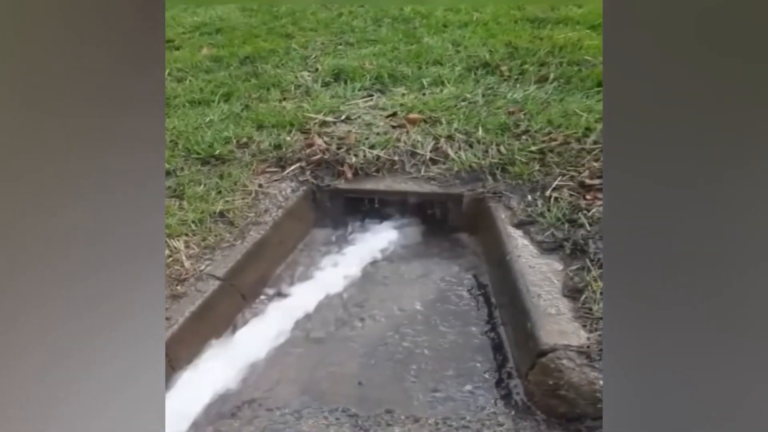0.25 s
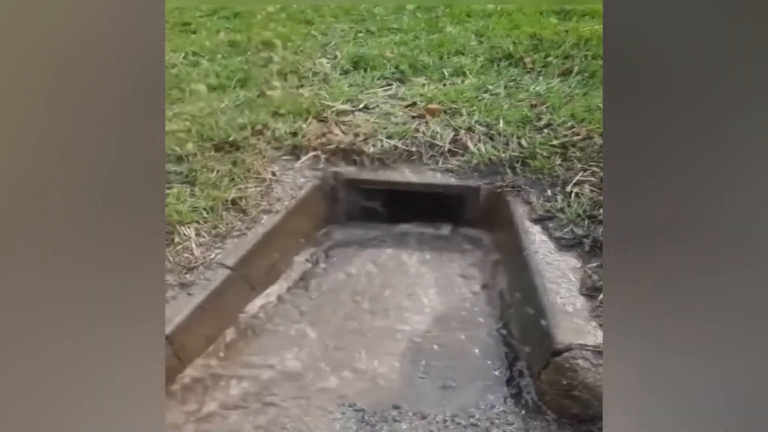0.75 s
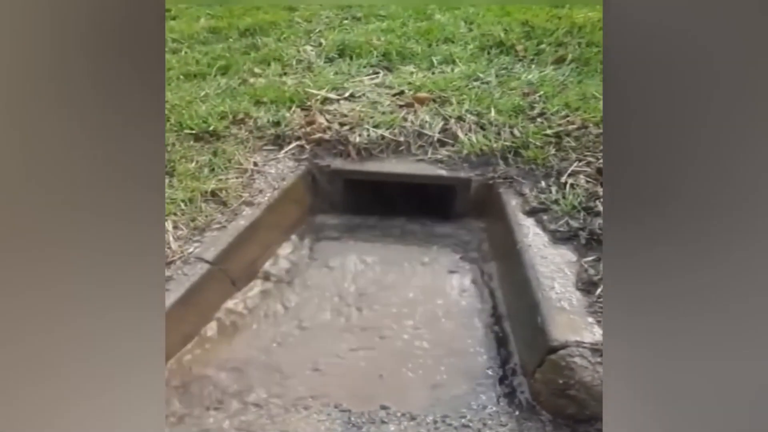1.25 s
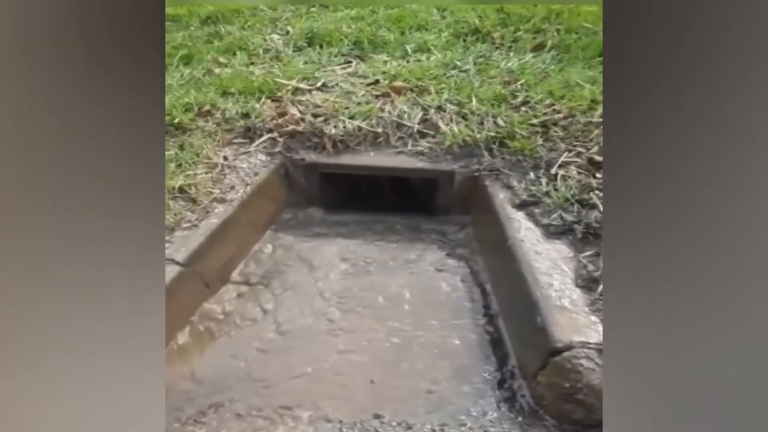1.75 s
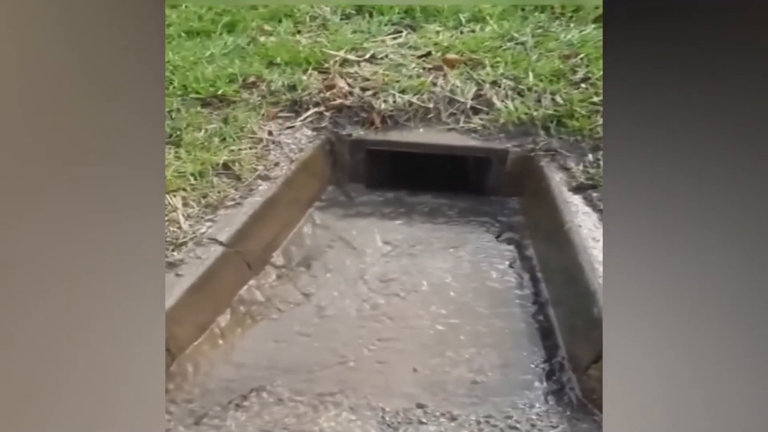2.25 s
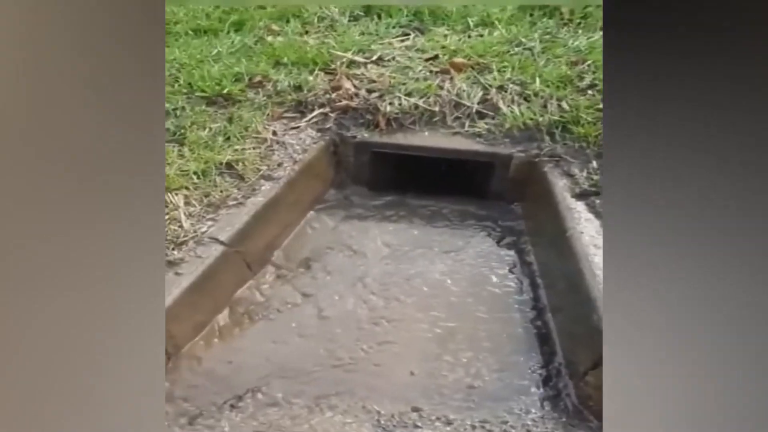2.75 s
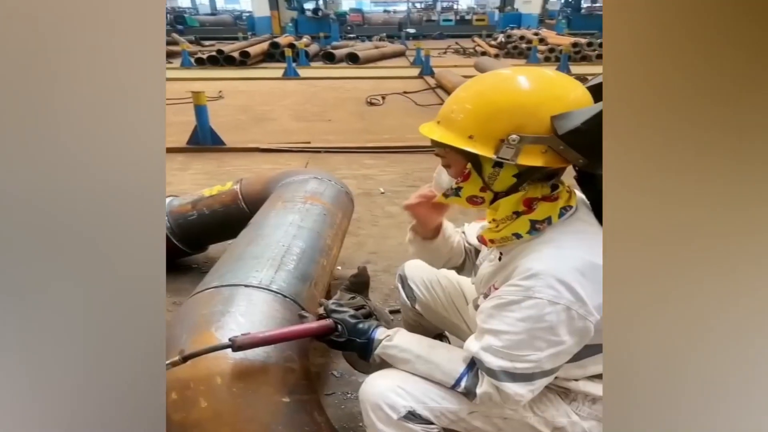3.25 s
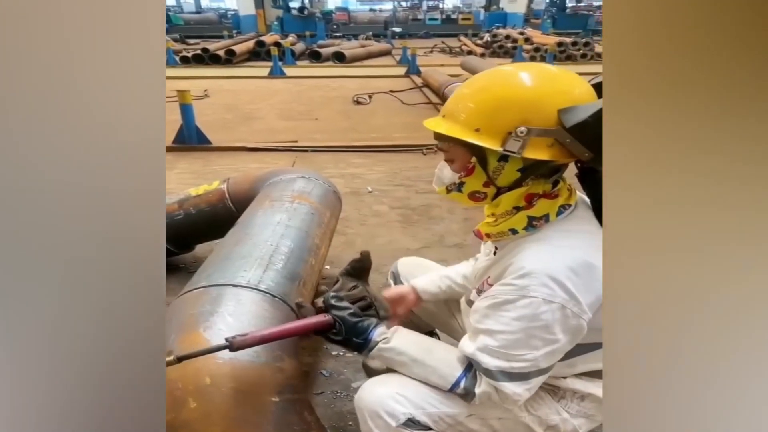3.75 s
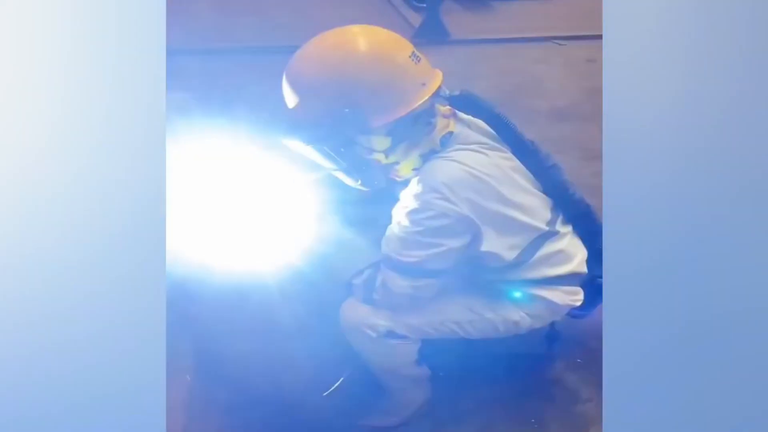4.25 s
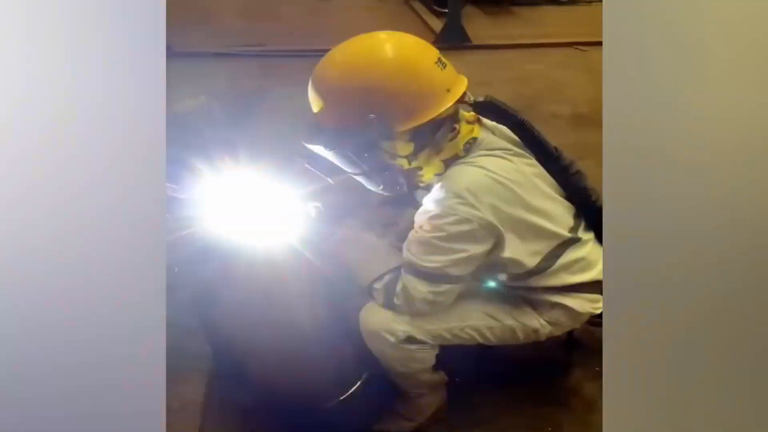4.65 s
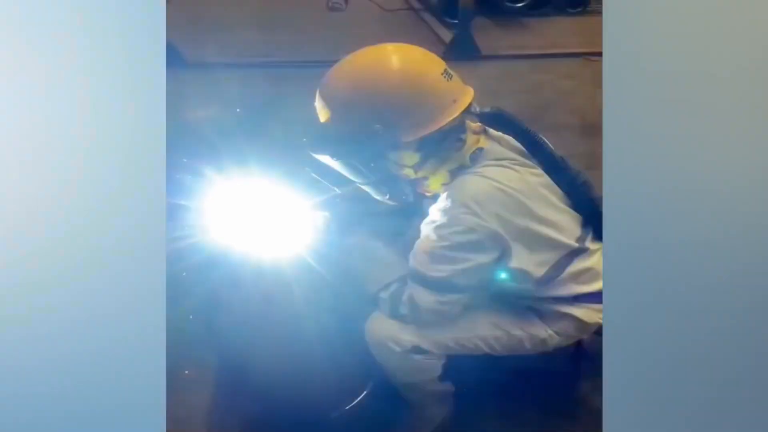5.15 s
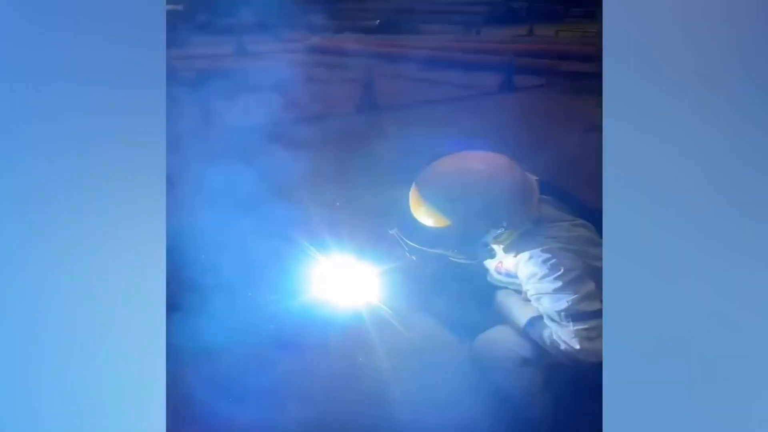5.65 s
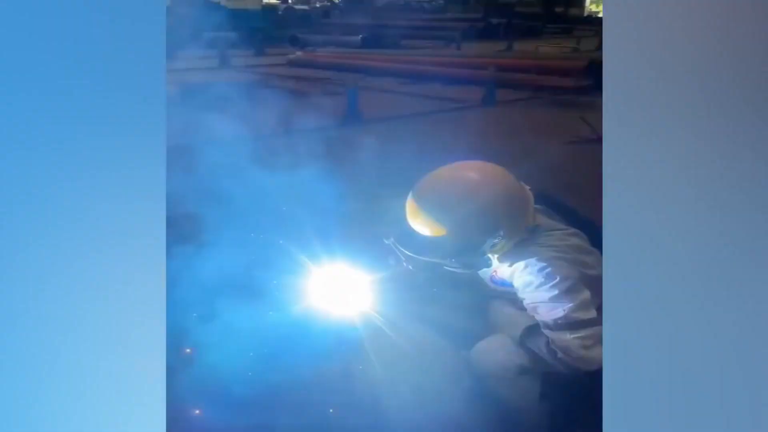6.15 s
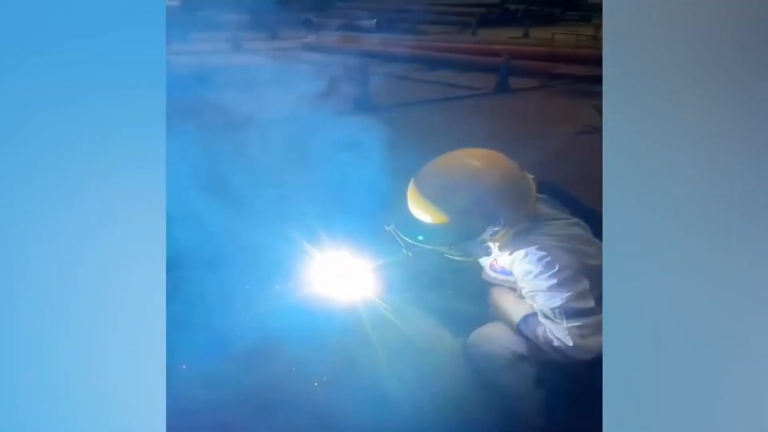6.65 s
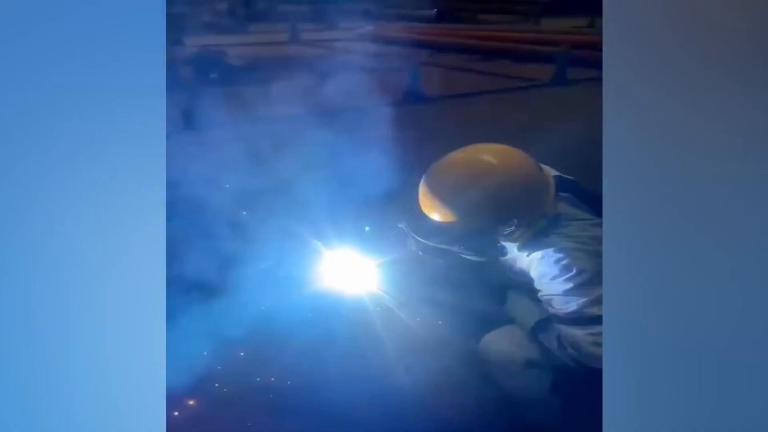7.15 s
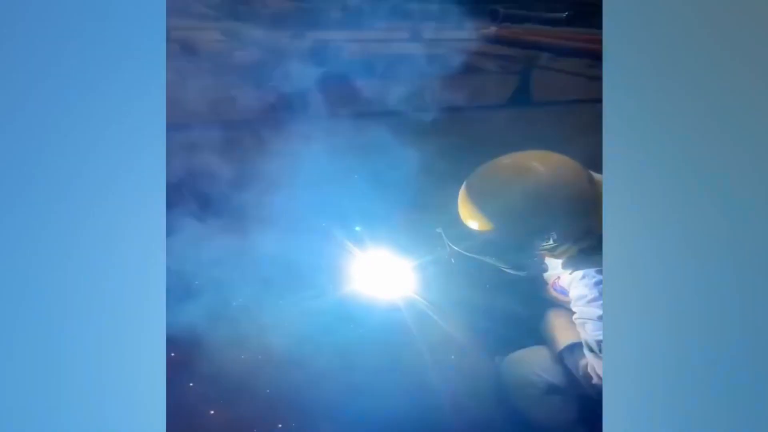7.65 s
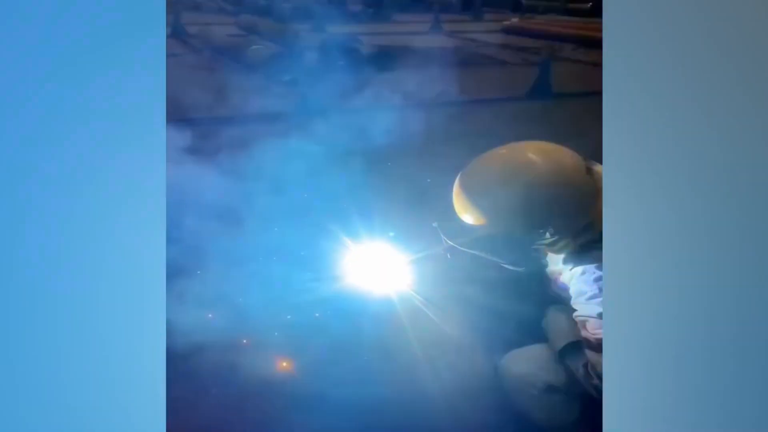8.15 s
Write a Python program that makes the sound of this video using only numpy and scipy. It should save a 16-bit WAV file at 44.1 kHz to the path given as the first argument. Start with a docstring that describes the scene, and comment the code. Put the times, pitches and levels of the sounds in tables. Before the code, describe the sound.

A water jet hisses in a drain over a droning pump engine, then a welding arc sputters, pops and hisses in a humming workshop.

```python
"""At a drain, then in a steel workshop. A sewer jetter blasts water through the drain pipe: on the right
the jet hisses, bursts through a plug of mud and goes on spraying, over the drone of its three-cylinder
pump engine. It all ends with a low bump. Then, in mono, fans and transformers hum in the workshop while
a stick welder strikes an arc. The arc sputters and pops as drops of molten metal burst, and later burns
with an even hiss."""
import sys
import numpy as np
from scipy import signal
from scipy.fft import rfft, irfft, next_fast_len
from scipy.io import wavfile
from scipy.ndimage import uniform_filter1d, map_coordinates

SR = 44100
rng = np.random.default_rng(int(sys.argv[2]) if len(sys.argv) > 2 else 0)


def pcm_store(signal):
    """Save signal as 16-bit PCM."""
    levels = np.round(np.clip(np.atleast_2d(signal), -1, 1) * 32767)
    wavfile.write(sys.argv[1], SR, levels.astype(np.int16).T)


N = 370440

MUD_START, BURST, MUD_END, JET_END = .35, .48, .569, 2.872  # at the drain, t/s
SHOP_START, STRIKE, SPUTTER_END, BURN_START = 2.985, 3.936, 5.446, 5.469  # in the workshop, t/s


# The water's tone (how strong each pitch is): f/Hz, level/dB
JET_TONE = [(300, -35), (500, -6), (1200, -8.5), (1900, -4.5), (2450, -1), (3000, -6.5), (3550, -12),
            (4200, -6.5), (5200, -7.5), (5800, -3), (6400, -1), (7300, -7), (9000, -14), (12400, -41)]  # at the mouth of the pipe
MUD_TONE = [(300, -37), (600, -7), (1100, -10.5), (1700, -3.5), (2300, 1), (2900, -6.5), (3700, -9.5),
            (4800, -2.5), (6200, 0), (7700, -3), (9000, -11.5), (12400, -42)]  # bursting through the mud
DEEP_PIPE_TONE = [(300, -10.5), (550, -10.5), (850, -11.5), (1120, -7), (1500, -9.5), (2200, -4.5),
                  (2700, -8), (3100, -3.5), (3700, -5), (5200, -5), (6350, 1.5), (6700, -1.5), (7700, -4),
                  (8100, -9), (9500, -13), (12400, -42)]  # further up the pipe
SPRAY_TONE = [(6000, -30), (8500, -21.5), (10000, -5.5), (11200, -2), (11900, 3), (12200, -6.5),
              (12800, -1), (14300, -4), (14700, -11.5), (15800, -11.5)]  # fine mist
# Gushes of spray: t/s, boost/dB
GUSHES = [(.64, 1), (.83, 2.5), (1.32, 3), (2.17, 1.5), (2.34, 2)]

def water_jet():
    """The jet bores through a plug of mud, then scours the pipe and throws fine spray in gushes."""
    opened = ramp(MUD_START, BURST)
    burst = opened - ramp(BURST, MUD_END)
    inside = ramp(1.12, 1.23)  # the nozzle is all the way in
    gush_db = sum(db * swell(s, rise=.064, fall=.095) for s, db in GUSHES)
    rush_db = -27.5 + 1.1 * opened + 7.5 * burst + .32 * gush_db
    spray_db = -34 + 7.5 * opened + 2 * inside + gush_db
    mud = np.clip(1.5 * burst, 0, 1)
    depth = ramp(.58, 1.27)  # the nozzle travels up the pipe
    pipe = np.sqrt(1 - depth) * splash(JET_TONE, rate=1500, click_db=-12, patchy_db=2.5)
    pipe += np.sqrt(depth) * splash(DEEP_PIPE_TONE, rate=1200, click_db=-8.5, patchy_db=2)
    rush = np.sqrt(1 - mud) * pipe + np.sqrt(mud) * splash(MUD_TONE, rate=900, click_db=-2.5, patchy_db=3)
    surge_db = .27 * wobble(22.17)
    spray = splash(SPRAY_TONE, rate=640, click_db=-8.5, patchy_db=2)
    rush *= amp(rush_db + surge_db + .43 * wobble(60))
    spray *= amp(spray_db + surge_db + .65 * wobble(45.1))
    return rush + spray


# Where the water sits: f/Hz, left minus right level/dB
WATER_BALANCE = [(400, -6), (1300, -9.5), (2400, -9.5), (4400, -8.5), (6500, -17.5), (8100, -13),
                 (12000, -17), (15000, -18.5)]
# How alike its two sides sound: f/Hz, likeness (1 = the same)
WATER_LIKENESS = [(300, 0.79), (640, 0.8), (1400, .05), (3100, 0.3), (7000, .12), (15000, .1)]

def splash(tone, rate, click_db, patchy_db):
    """Droplets hit the pipe, rate times a second, and are heard mostly on the right."""
    drops = np.array([patchy(crackle(rate, 5.5, click_db), patchy_db) for side in range(2)])
    pan = lambda hz: amp(along(WATER_BALANCE, hz))
    angle = lambda hz: np.arccos(np.clip(along(WATER_LIKENESS, hz), -1, 1))
    pair = filtered(drops, lambda hz: amp(along(tone, hz)) / np.hypot(1, pan(hz)))
    left = filtered(pair, lambda hz: pan(hz) * [np.cos(angle(hz)), np.sin(angle(hz))]).sum(0)
    right = pair[0]
    return np.array([left, right]) / np.std((left + right) / 2)


# Tone of the sputtering arc: f/Hz, level/dB
SPUTTER_TONE = [(400, -23), (700, -9.5), (950, -5), (1450, -9), (1900, -3.5), (2900, -2), (3500, -3),
                (4100, -6.5), (8200, -5), (9000, -8), (10500, -8.5), (11200, -18), (12200, -16),
                (13300, -9.5), (14700, -12), (15700, -10)]
# Pitches at which the pipe joint rings: f/Hz, width/Hz, boost/dB
JOINT_RING = [(2900, 220, 4.5), (4850, 260, 7), (5350, 200, -3), (5950, 330, 7), (6520, 180, -4),
              (7350, 350, 6), (8300, 250, 5)]
# Moments when the arc nearly goes out: start t/s, end t/s, level change/dB
NEAR_OUTS = [(4.594, 4.631, -5), (5.132, 5.167, -2)]

def sputtering_arc(pops):
    """The young arc fries raggedly and its drops burst, both ringing in the joint being welded."""
    heat_db = 2.9 * swell(4.45, rise=.44, fall=.4)  # it heats up and settles
    dips_db = sum(db * between(start, end) for start, end, db in NEAR_OUTS)
    level_db = -38 + heat_db + dips_db + 1.2 * wobble(70)
    frying = patchy(crackle(rate=1100, spread_db=3.8, click_db=-3), depth_db=1)
    hiss = amp(level_db) * coloured(frying, SPUTTER_TONE, JOINT_RING)
    cracks = amp(2) * np.std(pops) * coloured(pops, SPUTTER_TONE, JOINT_RING)
    return (hiss + cracks) * between(STRIKE, SPUTTER_END)


# Tone of the settled arc and of its high sizzle: f/Hz, level/dB
BURN_TONE = [(400, -21), (700, -4.5), (1150, -3), (1600, -9), (2000, -3.5), (2300, -7), (2850, -4),
             (3700, -4.5), (4800, -10), (6000, -6), (8000, -4), (8800, -5), (10000, -12.5), (14300, -40)]
SIZZLE_TONE = [(8000, -28), (10000, -11), (12000, -6.5), (13000, -3.5), (14500, 1), (15800, -7)]
# How the two rise and fall: t/s, relative burn level/dB, relative sizzle level/dB
BURN_STRENGTH = [(5.5, -38.5, -44), (5.64, -37, -41.5), (6.2, -39, -43), (6.92, -36.5, -38),
                 (7.2, -39, -39.5), (7.76, -38, -42.5), (8.08, -39.5, -44), (8.38, -39, -41)]
# Pitches at which the groove rings, at three spots along it: f/Hz, width/Hz, boost/dB
START_RING = [(2850, 180, 2), (3600, 200, 3.5), (5850, 190, 6), (6320, 160, -3), (6820, 220, 7),
              (7600, 200, 6), (8250, 180, 4)]
MIDDLE_RING = [(2900, 220, 3), (5300, 160, 4), (6150, 220, 4), (6700, 160, -3), (7280, 200, 5),
               (8130, 260, 8)]
END_RING = [(2900, 200, 3.5), (5350, 160, 2.5), (6100, 200, 3.5), (6650, 200, -4), (7300, 230, 6),
            (7920, 260, 7)]
# Where the welding rod is: t/s, spot (0 = start, 2 = end)
ROD_PATH = [(6.2, 0), (6.45, 1), (7.25, 0.74), (7.55, 1.6)]

def even_arc(pops):
    """The settled arc hisses and flares at each drop; the groove's ring shifts as the rod moves."""
    burn_db, sizzle_db = curves(BURN_STRENGTH)
    position, = curves(ROD_PATH)
    flares = sum(swell(s, rise=.046, fall=.046) for s, db, wait in MOLTEN_DROPS if s > BURN_START)
    flare_db = 2 * flares + .75 * wobble(50)
    frying = patchy(crackle(rate=1500, spread_db=3.7, click_db=-9), depth_db=1.6)
    burn = sum(np.clip(1 - np.abs(position - spot), 0, 1) * coloured(frying, BURN_TONE, ring)
               for spot, ring in enumerate([START_RING, MIDDLE_RING, END_RING]))
    fine_frying = patchy(crackle(rate=1500, spread_db=4, click_db=-9), depth_db=1)
    sizzle = coloured(fine_frying, SIZZLE_TONE)
    cracks = np.std(pops) * (amp(-2) * coloured(pops, BURN_TONE) + amp(1) * coloured(pops, SIZZLE_TONE))
    hiss = amp(burn_db + .95) * burn + amp(sizzle_db + 1) * sizzle
    return (amp(flare_db) * hiss + cracks) * between(BURN_START, N / SR + 1, fade=.015)


# Drops of molten metal that short the arc: t/s, relative level/dB, wait until it relights/s
MOLTEN_DROPS = [(3.9375, -29, .001), (3.964, -22.5, .001), (4.0154, -22, .0036), (4.0583, -24.5, .001),
                (4.0712, -30, .001), (4.1185, -23, .001), (4.359, -24.5, .001), (4.4061, -26, .003),
                (4.5053, -21.5, .0017), (4.5417, -24.5, 0.0011), (4.5849, -20.5, 0.0052),
                (4.6321, -19.5, 0.0045), (4.659, -24, .001), (4.759, -22, 0.0011), (4.9051, -20, .001),
                (5.0718, -19.5, .0074), (5.1225, -21, 0.0066), (5.2257, -21.5, .004), (5.2566, -22, .002),
                (5.268, -23.5, 0.0034), (5.3383, -19.5, .0067), (5.4234, -23, 0.00094),
                (5.8452, -24.5, 0.00092), (6.1421, -24, .003), (7.2678, -27.5, .001), (7.8053, -27, 0.0026),
                (8.0005, -23.5, .001), (8.2011, -27, .001)]

def bursting_drops(crack_s=.00096, fizz_s=.0033, echo_s=.08, sparks_per_s=6):
    """Each drop fizzes and bursts, then the arc relights with a second crack; small sparks fall too."""
    lead = SR // 50
    t = (np.arange(SR // 5) - lead) / SR
    fizz = amp(-11) * np.exp(-np.abs(t) / fizz_s)
    hall_echo = amp(-23.5 - 60 * np.abs(t) / echo_s)
    shape = np.where(t < 0, fizz, np.exp(-np.abs(t) / crack_s) + hall_echo)
    cracks = [crack for s, db, wait in MOLTEN_DROPS for crack in [(s, db), (s + wait, db - 2)]]
    sparks = np.flatnonzero(rng.random(N) < sparks_per_s / SR * between(STRIKE, SPUTTER_END))
    spark_db = rng.normal(-29.5, 2.5, N)[sparks]
    cracks += zip(sparks / SR, spark_db)
    power = np.zeros(N + SR)
    for s, db in cracks:
        power[round(s * SR) - lead:][:len(t)] += (amp(db) * shape) ** 2
    return np.sqrt(power[:N]) * np.sign(rng.standard_normal(N))


# The tones in the exhaust note: vibrations per engine cycle, relative level/dB
EXHAUST_TONES = [(2, -14), (3, 2.5), (5, -20.5), (6, -8), (8, -17.5), (9, -14), (13, -22.5), (15, -26),
                 (18, -24.5), (21, -30), (27, -24)]
# Tone of the puffs of gas: f/Hz, level/dB
PUFF_TONE = [(15, -35), (35, -25), (60, -2.5), (110, 0.5), (190, -1.5), (270, -4), (320, -7.5), (420, -8.5),
             (600, -15.5), (1000, -19), (2500, -39)]
# Pitches at which the engine's housing rings: f/Hz, width/Hz, boost/dB
HOUSING_RING = [(383, 14, 13), (170, 10, 8)]

def pump_engine(firing_hz=87.25):
    """Three slightly unequal cylinders drone and puff out gas at each firing."""
    # the drone's level drops about half a second in, then slowly fades
    drone_db = -19.5 - 4 * ramp(.35, .569) - .63 * clock()
    speed = 1 + .0019 * wobble(2.94) + .0051 * wobble(24.94)
    firing = 2 * np.pi * np.cumsum(firing_hz * speed) / SR
    cycle = firing / 3  # three firings make one cycle
    note = sum(amp(db + 1.1 * wobble(14)) * np.cos(order * cycle) for order, db in EXHAUST_TONES)
    puffs = coloured(rng.standard_normal(N) * amp(1.3 * np.cos(firing)), PUFF_TONE, HOUSING_RING)
    throb_db = .5 * wobble(20)
    note_sides, puff_sides = amp([[-2.7], [.8]]), amp([[-9.5], [-4.3]])  # left, right
    return amp(drone_db + throb_db) * (note_sides * unit(note) + puff_sides * puffs)


# The bump as the water ends: t/s, f/Hz, level/dB
BUMP = (2.876, 42, -20)

def low_bump(width_s=.0039):
    """One short, soft, low push of air."""
    s, hz, db = BUMP
    t = clock() - s
    return -amp(db) * np.cos(2 * np.pi * hz * t) * np.exp(-(t / width_s) ** 2)


# Tone of the workshop air, before the arc and under it: f/Hz, level/dB
IDLE_AIR_TONE = [(20, -28), (64, -3), (99, -18.5), (160, -9.5), (260, -16.5), (340, -20.5), (450, -18),
                 (780, -19.5), (1000, -23), (2000, -26), (2900, -23), (3900, -32.5), (5100, -34),
                 (7800, -34), (11300, -57), (13600, -40), (15700, -49)]
ROAR_TONE = [(15, -25), (30, -5), (100, -4), (160, -5), (240, -8.5), (305, -1.5), (360, -8), (500, -8),
             (800, -11.5), (1300, -13), (2000, -25), (3000, -60)]
# Hum of fans and transformers before the arc, under the sputter, under the burn: f/Hz, level/dB
IDLE_HUM = [(64.6, -54), (156.1, -63), (312.2, -51.5), (355.3, -54), (527.6, -61.5), (705.2, -57.5),
            (775.2, -57.5)]
SPUTTER_HUM = [(64.6, -54), (156.1, -59.5), (301.5, -51.5), (355.3, -54.5), (899.0, -59.5)]
BURN_HUM = [(91.5, -60.5), (156.1, -55.5), (301.5, -52.5), (312.5, -54.5), (500.6, -62.5), (597.5, -64),
            (899, -63)]
# A distant machine whines once: peak t/s, rise/s, fall/s, peak level/dB, size of the swell/dB
DISTANT_WHINE = (7.82, .17, 0.6, -48, 22)

def workshop():
    """The ventilation roars and machines hum in the hall."""
    idle = amp(-42) * coloured(rng.standard_normal(N), IDLE_AIR_TONE)
    idle += hum(IDLE_HUM, waver_db=2.7, drift_hz=1.57)
    roar = coloured(rng.standard_normal(N), ROAR_TONE) * amp(.7 * wobble(6))
    peak, rise, fall, peak_db, depth_db = DISTANT_WHINE
    whine_db = peak_db + depth_db * (swell(peak, rise, fall) - 1)
    whine = amp(whine_db) * hum([(501, 0)], waver_db=2.2, drift_hz=1.94)
    early = amp(-46.5) * roar + amp(-.5) * hum(SPUTTER_HUM, waver_db=2.7, drift_hz=1.56)
    late = amp(-45) * roar + whine + hum(BURN_HUM, waver_db=2.6, drift_hz=2.64)
    waiting = between(2.927, 2.947) + between(SHOP_START, STRIKE)  # a short blip comes first
    return idle * waiting + early * between(STRIKE, SPUTTER_END) + late * between(BURN_START, N / SR + 1)


def hum(tones, waver_db, drift_hz):
    """Machine tones that waver on their way through the hall."""
    sound = np.zeros(N)
    for hz, db in tones:
        gain = np.sqrt(2) * amp(db + waver_db * wobble(5))
        sound += gain * np.sin(2 * np.pi * np.cumsum(hz + drift_hz * wobble(9)) / SR)
    return sound


def crackle(rate, spread_db, click_db):
    """Hiss with rate tiny clicks a second; echoes off nearby surfaces make it slightly hollow."""
    hiss, size, chance = rng.standard_normal(N), rng.standard_normal(N), rng.random(N)
    clicks = (chance < rate / SR) * np.sign(rng.standard_normal(N))
    clicks *= amp(spread_db * np.clip(size, -2, 2))
    direct = hiss + amp(click_db) * unit(clicks)
    echoes = sum(np.roll(direct, round(delay_s * SR)) for delay_s in rng.uniform(.003, .014, 8))
    return unit(direct + .13 * echoes)


def patchy(x, depth_db):
    """Swirling flow shifts the tone, in patches a few hundred Hz wide and a quarter second long."""
    spectra = signal.stft(x, nperseg=512)[2]
    patches = uniform_filter1d(rng.standard_normal(spectra.shape), 5, axis=0)
    patches = uniform_filter1d(patches, 45, axis=1)
    return signal.istft(spectra * amp(depth_db * unit(patches)), nperseg=512)[1][:N]


def coloured(x, tone, rings=()):
    """Give x a tone and ringing pitches, at strength 1."""
    ring_db = lambda hz: sum(db * np.exp(-((hz - centre) / width) ** 2) for centre, width, db in rings)
    return unit(filtered(x, lambda hz: amp(along(tone, hz) + ring_db(hz))))


def filtered(x, gain):
    """Turn each frequency of x up or down by gain(hz)."""
    size = next_fast_len(N + 8192)
    return irfft(rfft(x, size) * gain(np.fft.rfftfreq(size, 1 / SR)), size)[..., :N]


def amp(db):
    """Decibels to gain."""
    return 10 ** (np.asarray(db) / 20)


def unit(x):
    """Scale to an average strength (rms) of 1."""
    return x / np.sqrt(np.mean(x ** 2) + 1e-20)


def clock():
    """Time of each sample."""
    return np.arange(N) / SR


def along(points, hz):
    """Read between (f/Hz, value) points, with octaves evenly spaced."""
    freqs, values = np.transpose(points)
    return np.interp(np.log(hz + 1), np.log(freqs + 1), values)


def curves(rows):
    """One value per sample for each column after the time."""
    times, *columns = np.transpose(rows)
    return [np.interp(clock(), times, column) for column in columns]


def wobble(rate):
    """A smooth random curve through rate points a second."""
    return map_coordinates(rng.standard_normal(int(N * rate / SR) + 4), [clock() * rate])


def between(start, end, fade=.0046):
    """1 from start to end, with short fades."""
    return np.clip((clock() - start) / fade + .5, 0, 1) * np.clip((end - clock()) / fade + .5, 0, 1)


def ramp(start, end):
    """0 before start, 1 after end."""
    return np.interp(clock(), [start, end], [0, 1])


def swell(peak, rise, fall):
    """0 to 1 at the peak and back to 0."""
    return ramp(peak - rise, peak) - ramp(peak, peak + fall)


def scene():
    """The drain dies away quickly; after a moment of silence comes the workshop."""
    fade = amp(-750 * np.maximum(clock() - JET_END, 0))
    # between the two arcs the level dips briefly to a faint hiss
    dip = amp(-61) * coloured(rng.standard_normal(N), SPUTTER_TONE) * between(SPUTTER_END, BURN_START)
    drain = (pump_engine() + water_jet()) * fade + low_bump()
    hall = workshop()
    pops = bursting_drops()
    return drain + sputtering_arc(pops) + even_arc(pops) + hall + dip


def record(dry, top_hz=15780):
    """Cut away the very highest treble."""
    return filtered(dry, lambda hz: hz < top_hz)


dry = scene()
out = record(dry)
pcm_store(out)
```